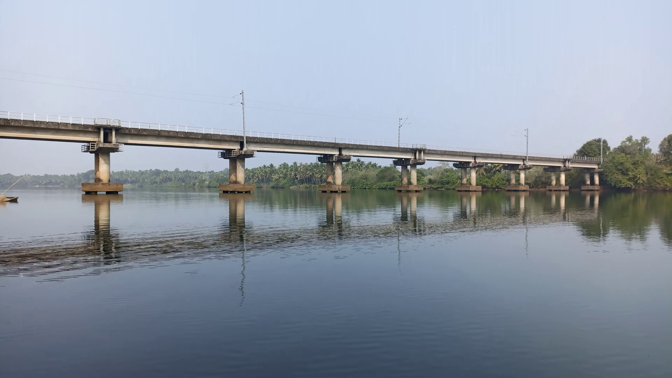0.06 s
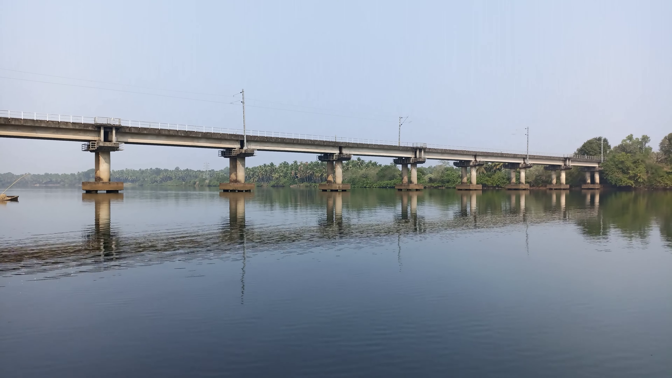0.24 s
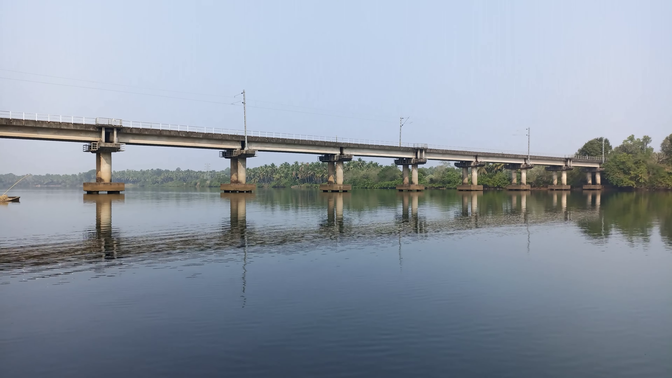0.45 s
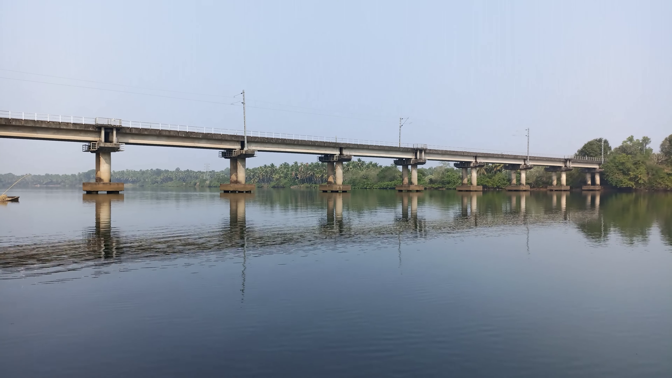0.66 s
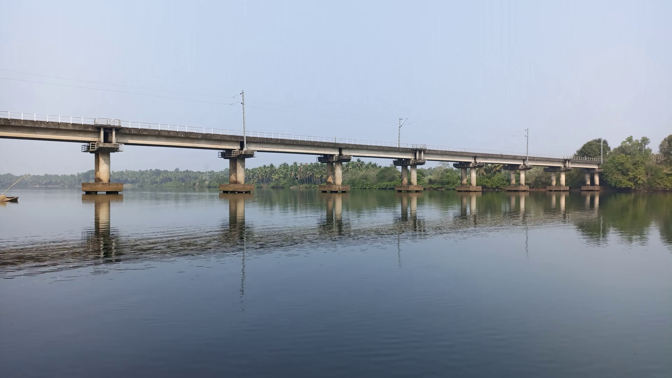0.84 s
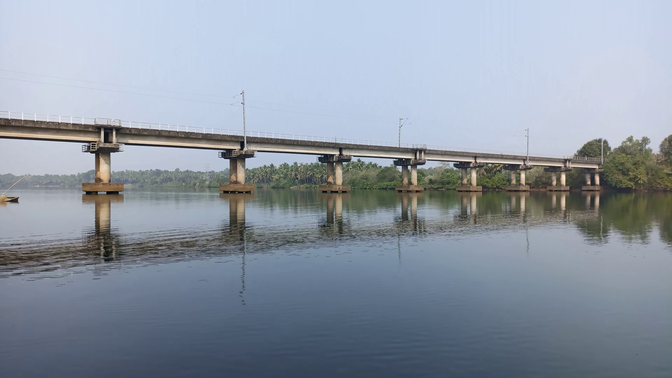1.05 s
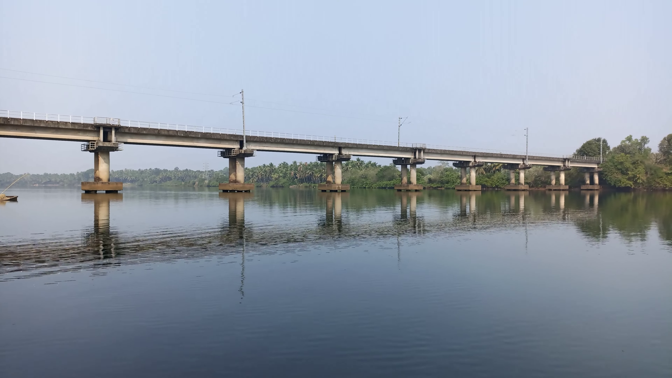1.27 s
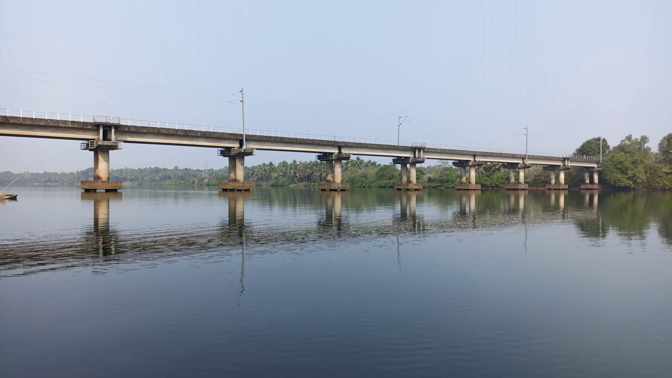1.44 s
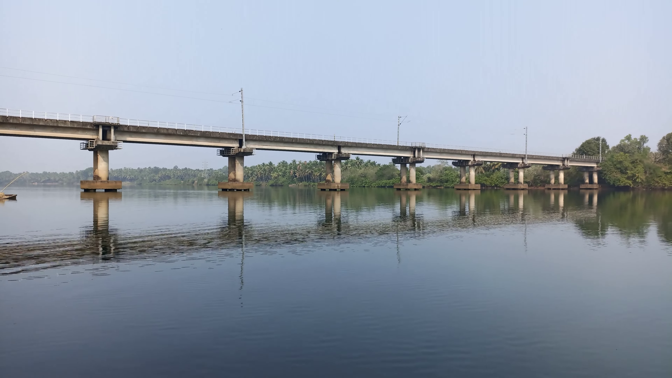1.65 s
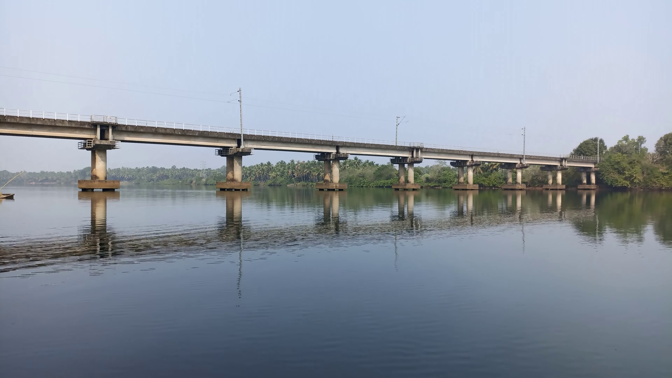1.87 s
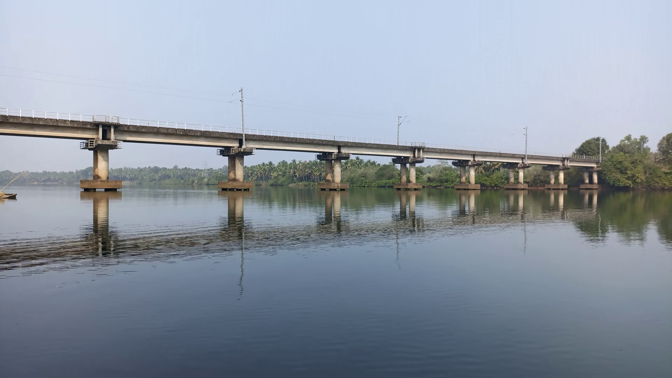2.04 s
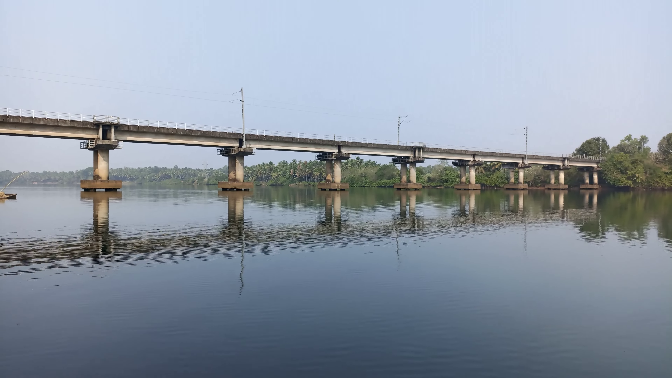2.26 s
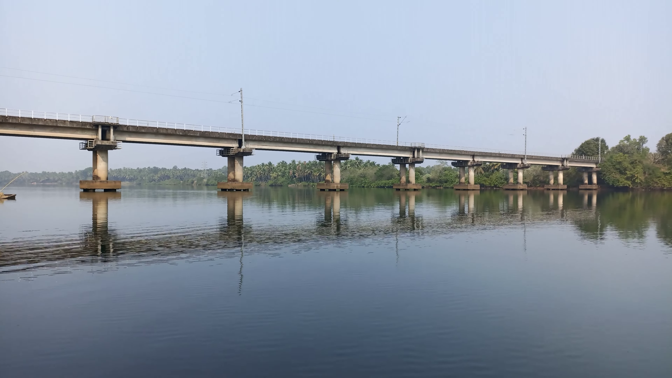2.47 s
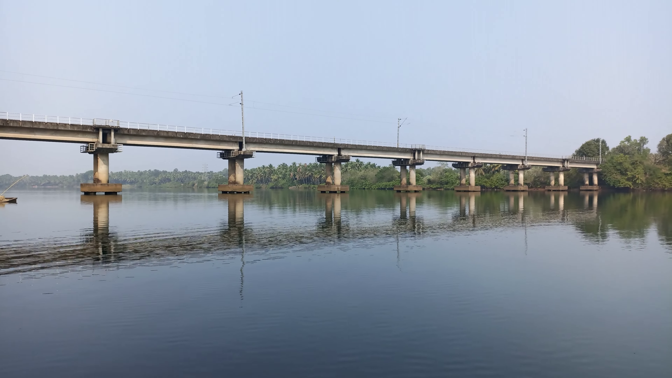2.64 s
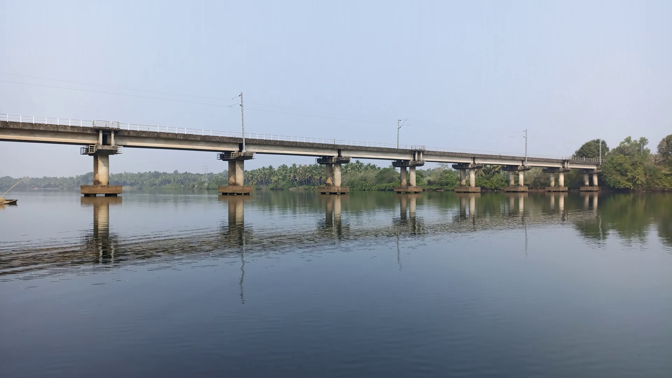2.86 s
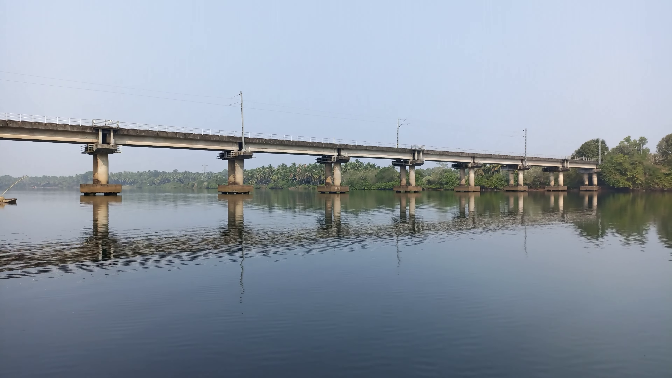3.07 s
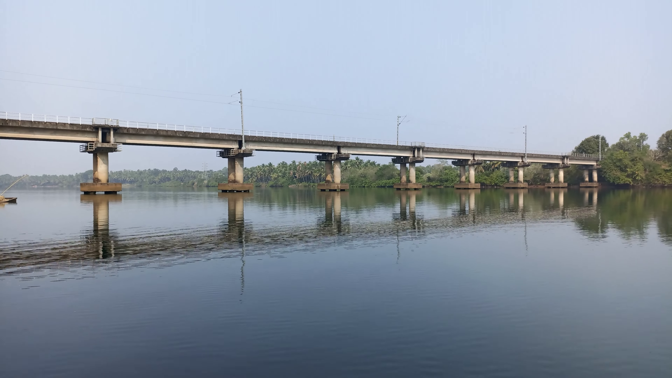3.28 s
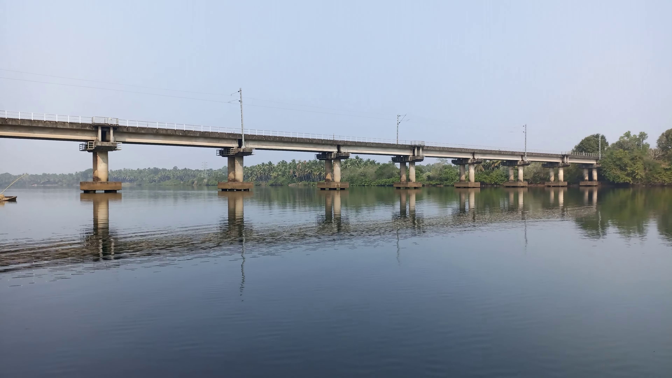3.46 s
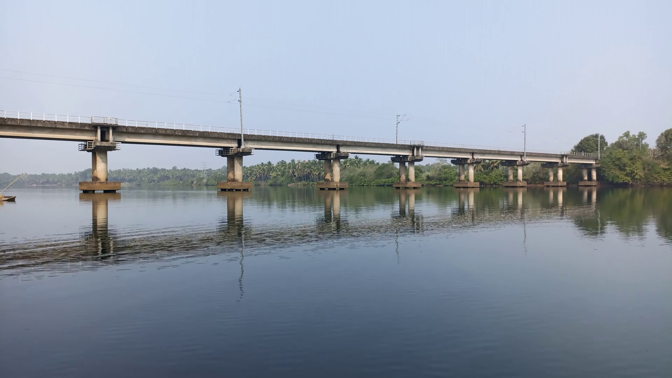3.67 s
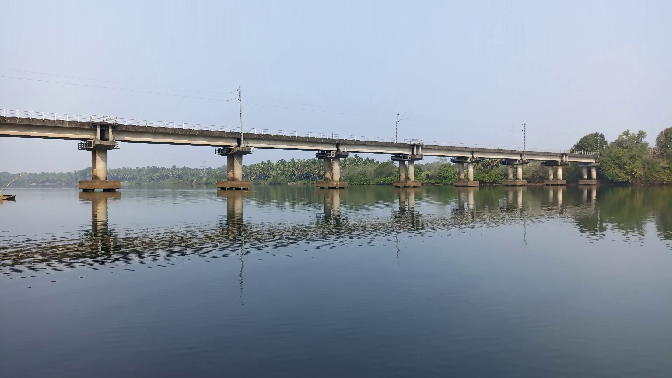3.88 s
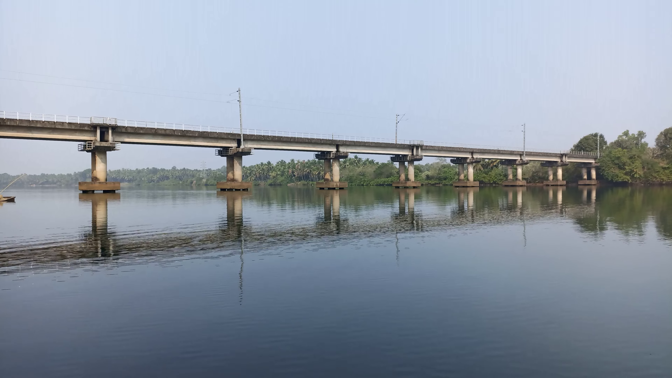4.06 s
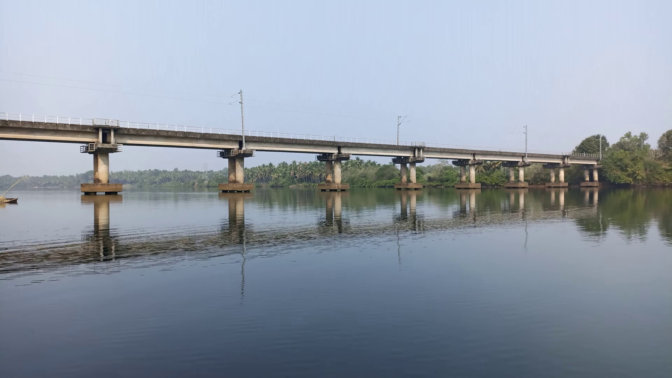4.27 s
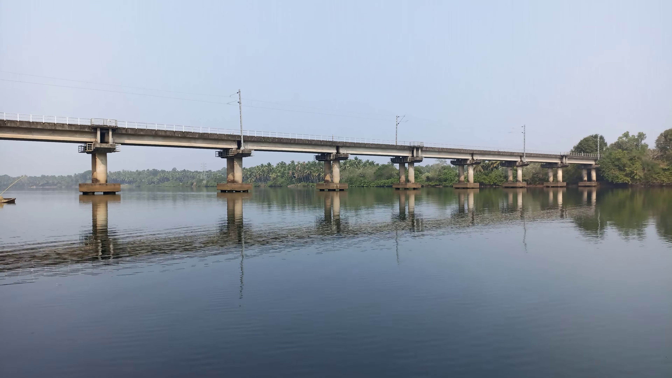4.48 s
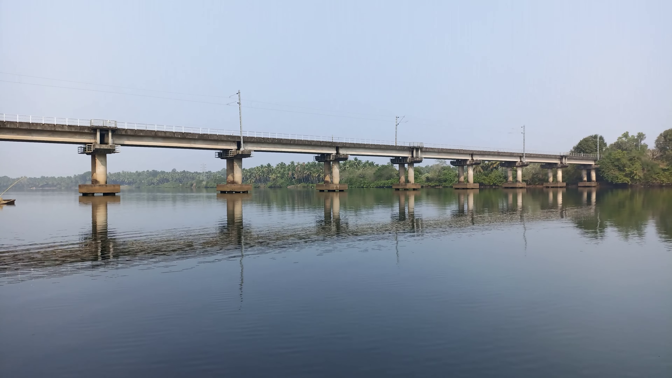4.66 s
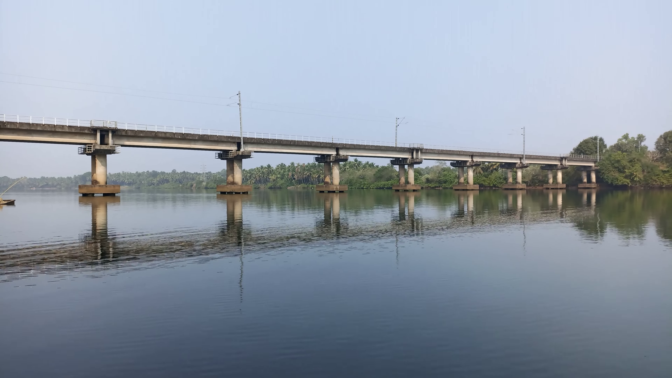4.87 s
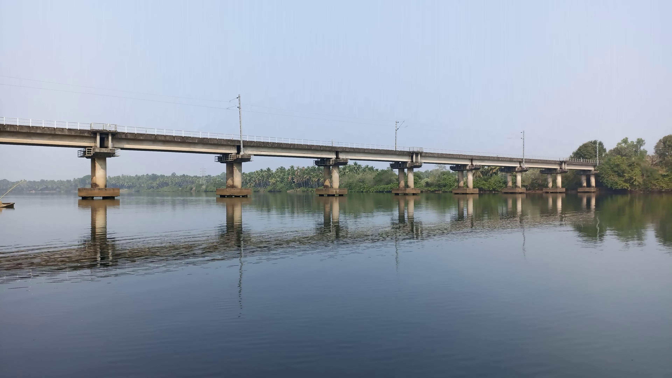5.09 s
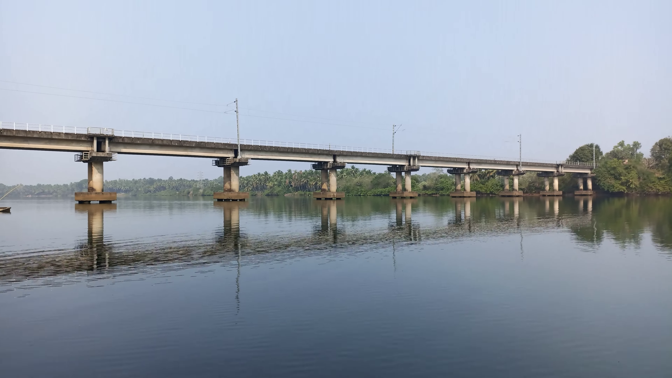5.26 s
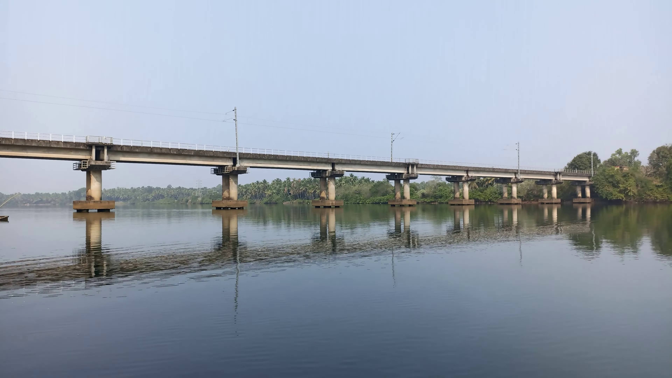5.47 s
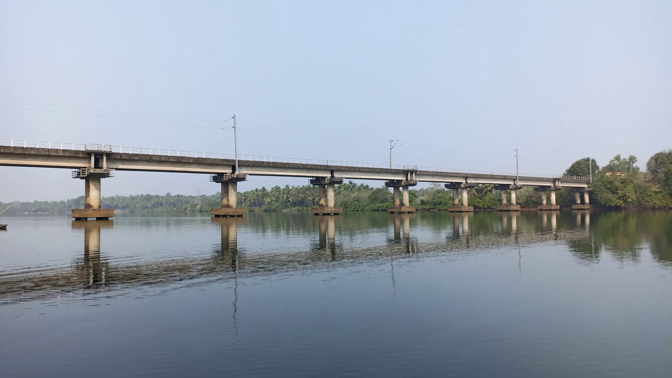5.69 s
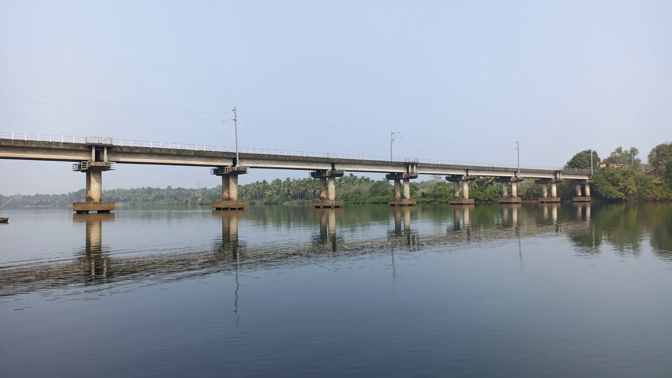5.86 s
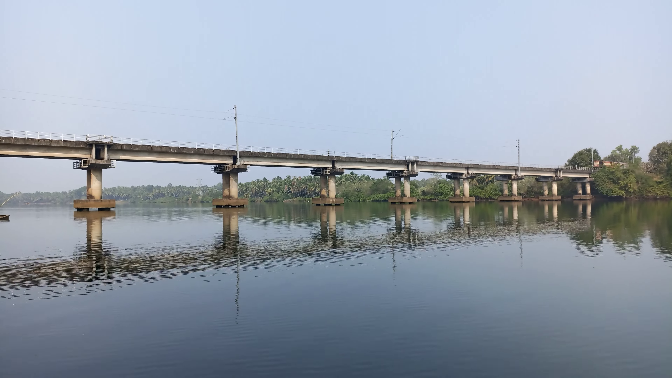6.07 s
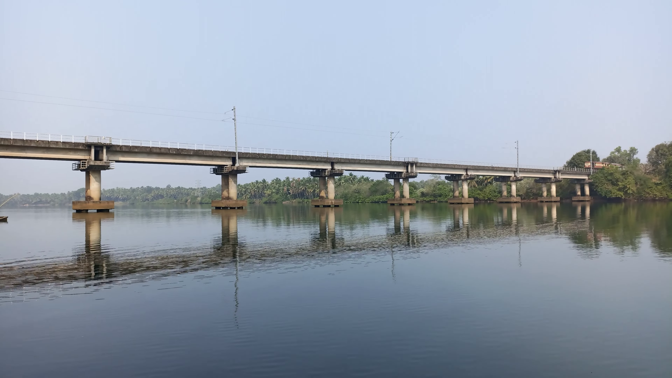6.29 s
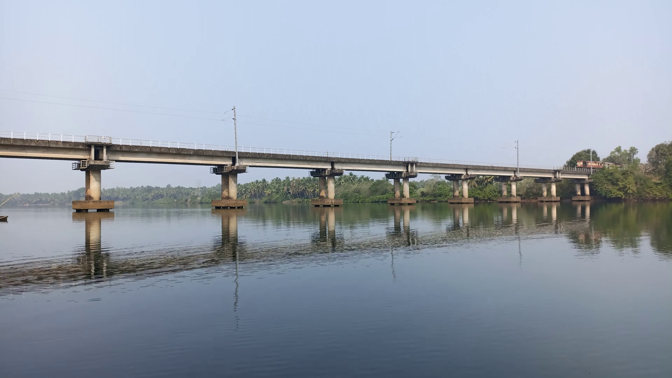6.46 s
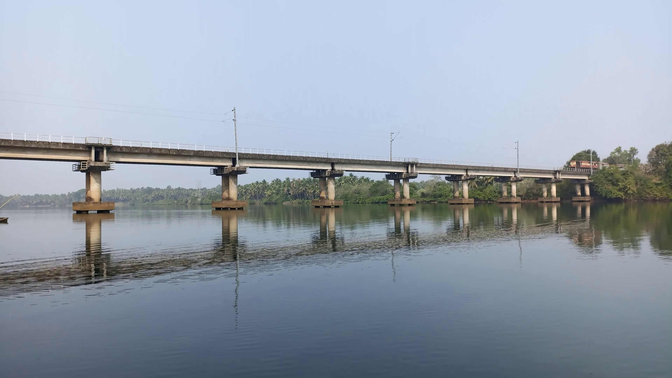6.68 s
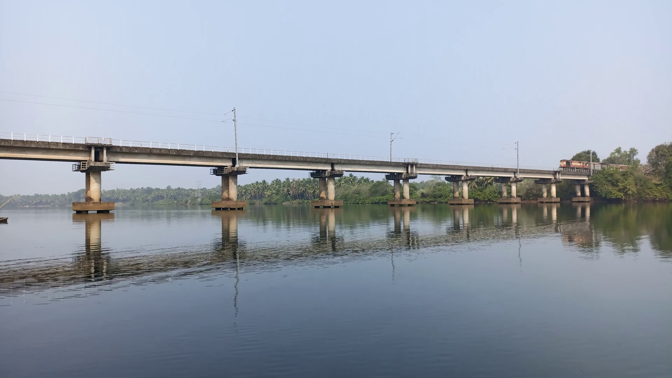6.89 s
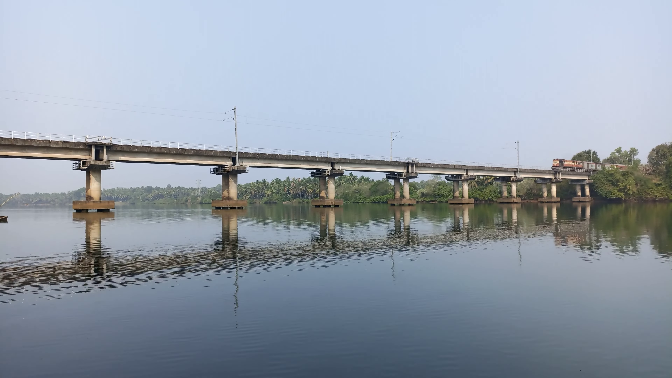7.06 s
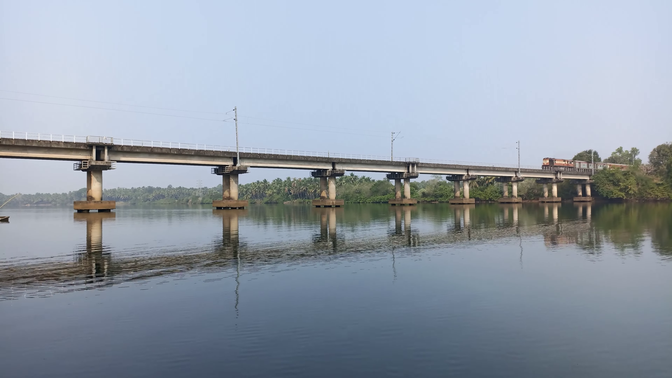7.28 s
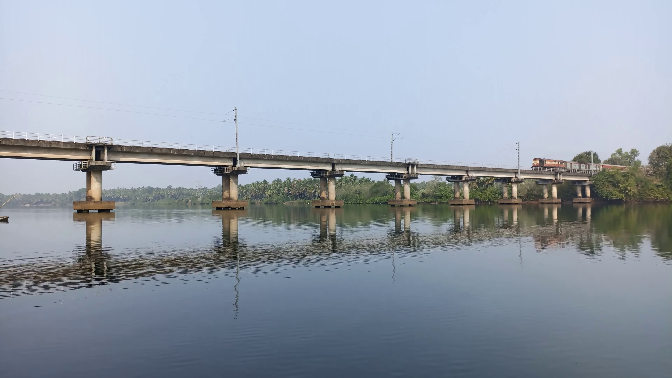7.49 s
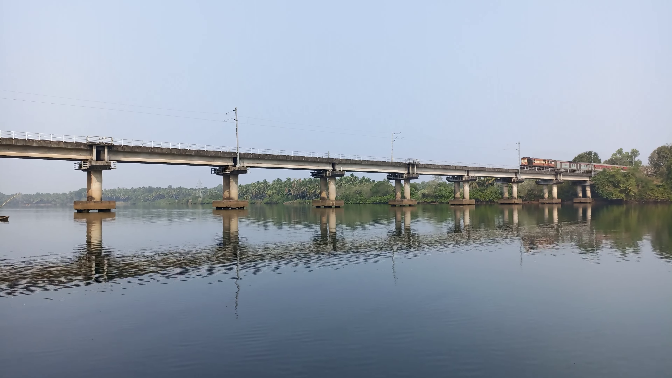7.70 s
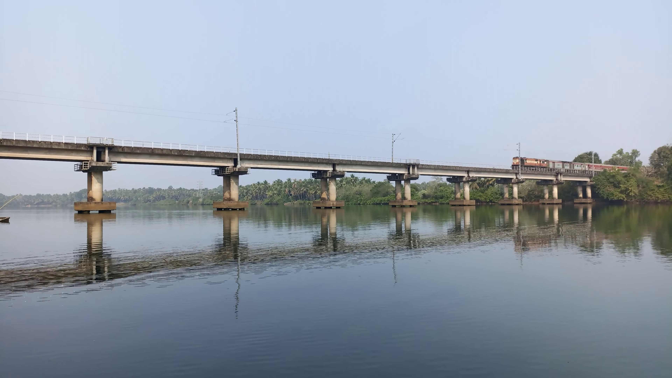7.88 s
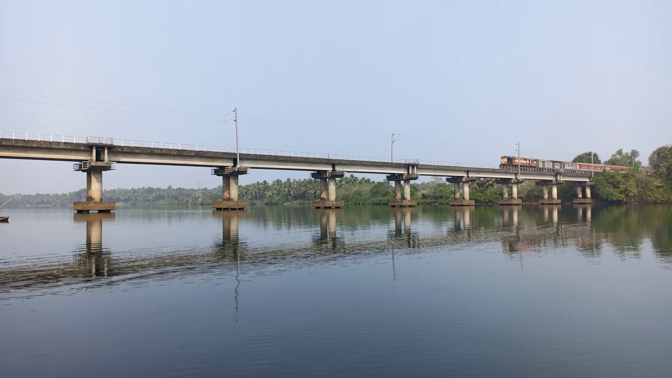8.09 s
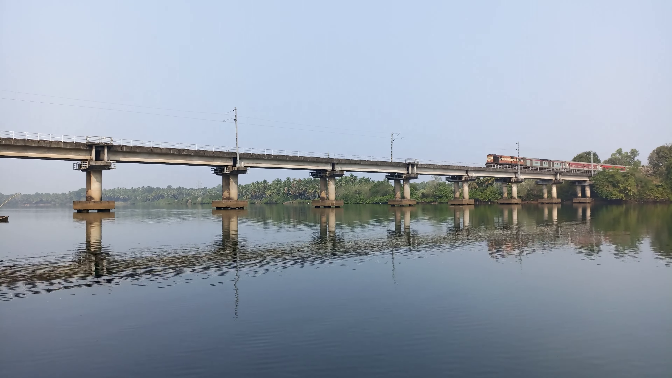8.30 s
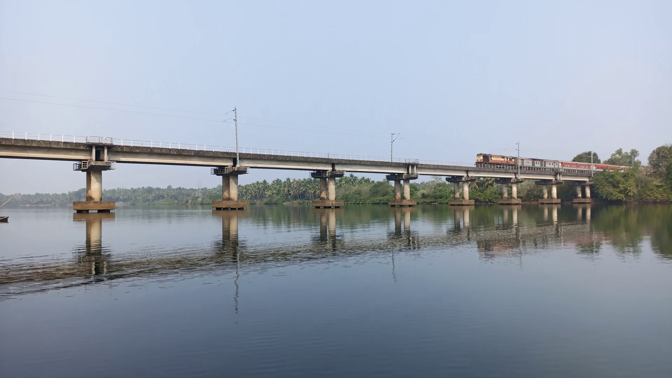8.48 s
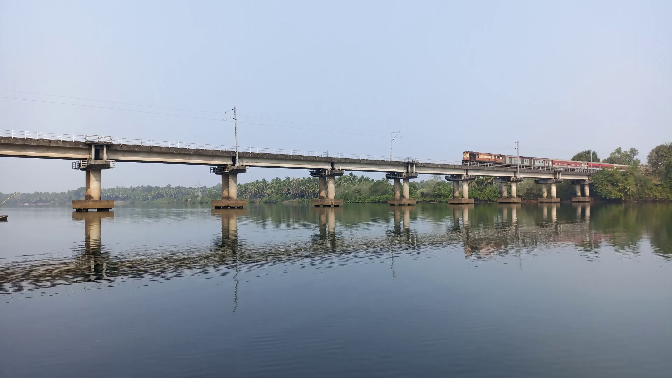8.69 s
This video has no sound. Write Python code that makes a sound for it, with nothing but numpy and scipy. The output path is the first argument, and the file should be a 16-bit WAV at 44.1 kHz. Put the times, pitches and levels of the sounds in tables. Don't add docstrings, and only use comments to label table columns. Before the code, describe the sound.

Riverbank stereo, open air over calm water, with faint steady microphone hiss. At 0 s a low two-note train horn is just ending; it stops at about 0.13 s and fluttering echoes fade by 1.2 s. Dry grass snaps and swishes, and a far bird twitters on the left in the first second and near 2.8 s. A close left cricket gives short trills around 0.6, 1.1, 2.1, 3.2 and 3.9 s; a sharp stalk snap comes at 3.2 s. Beneath, a diesel's deep uneven throb and hums notch up around 2.5-3.5 s and keep growing. From 5 s the train clears the trees: rolling roar and hiss brighten, joints clack, and flanges squeal near 3 kHz, crying out around 5.6-6.9 s. After 7.4 s it rolls over open water, with heavier clacks and gritty metallic clanks, still swelling at 8.7 s.

```python
import sys
import numpy as np
from scipy import signal
from scipy.fft import rfft, irfft, next_fast_len
from scipy.io import wavfile
from scipy.ndimage import uniform_filter1d, map_coordinates

SR = 44100
rng = np.random.default_rng(int(sys.argv[2]) if len(sys.argv) > 2 else 0)


def unload_wav(signal):
    wavfile.write(
        sys.argv[1],
        SR,
        np.round(np.clip(np.atleast_2d(signal).T, -1, 1) * 32767).astype(np.int16),
    )


def gain_from_db(level_db):
    decades = np.asarray(level_db, float) / 20
    return 10 ** decades


N = 385434
TIME = np.arange(N) / SR

# [t/s, nearness/dB, clear of the trees on the far bank 0-1]
APPROACH = [(0, -19.5, 0.43), (.7, -17.5, 0.12), (1.5, -14, .0), (2.3, -12.5, .0), (3.0, -11.5, 0.15),
            (3.7, -9.5, 0.14), (4.3, -8, 0.1), (4.8, -7, 0.33), (5.3, -7, 0.58), (5.9, -6, 0.76),
            (6.4, -4, 0.87), (6.9, -3.5, 0.83), (7.4, -3.5, 0.96), (8, -1.5, 0.9), (8.4, -1.5, 0.96),
            (8.74, 0, 0.87)]


def evened(x):
    return x / np.sqrt(np.mean(x ** 2) + 1e-20)


def read(points, hz):
    f, value = np.transpose(points)
    return np.interp(np.log(hz + 1), np.log(f + 1), value)


def curves(rows, t=TIME):
    s, *columns = np.transpose(rows)
    return [np.interp(t, s, c) for c in columns]


def waver(rate_hz):
    t = TIME[::256]
    rates = np.geomspace(rate_hz / 8, rate_hz, 12)
    slow = sum(np.sin(2 * np.pi * (f * t + rng.random())) for f in rates)
    return np.interp(TIME, t, evened(slow))


def noise(spectrum, patchy_db, likeness=0.46, size=1024, loss_db=0 * TIME):
    # [f/Hz, likeness 0-1]
    port_likeness = [(60, .995), (200, .985), (500, .9), (1000, .66), (2200, .8), (4500, .7), (6500, .72),
                     (9000, .55), (14000, .45)]
    hop, hz = size // 4, np.fft.rfftfreq(size, 1 / SR)
    a, b, c, d, patches = rng.standard_normal((N // hop + 5, len(hz), 5)).T
    patches = uniform_filter1d(patches, size=5, axis=0)
    patches = evened(uniform_filter1d(patches, size=14, axis=1))
    same = np.clip(likeness * read(port_likeness, hz), 0, 1)[:, None]
    left = a + 1j * b
    right = same * left + np.sqrt(1 - same ** 2) * (c + 1j * d)
    z = np.array([left, right])
    frame_s = np.arange(z.shape[2]) * hop / SR
    air_db = np.outer((hz / 1e4) ** 2, np.interp(frame_s, TIME, loss_db))
    inside = (hz >= spectrum[0][0]) & (hz <= spectrum[-1][0])
    z *= gain_from_db(read(spectrum, hz)[:, None] + patchy_db * patches - air_db) * inside[:, None]
    return evened(signal.istft(z, nperseg=size, noverlap=size - hop)[1][:, :N])


def bursts(events, rise_s):
    shape = np.zeros(N)
    for s, db, ring in events:
        t = np.maximum(TIME - s, 0)
        shape += gain_from_db(db - 60 * t / max(ring, .02)) * (1 - np.exp(-t / rise_s))
    return shape


def peaks(t, db, rise_db_per_s, fall_db_per_s):
    return gain_from_db(db + np.minimum(rise_db_per_s * t, -fall_db_per_s * t))


def level_db(nearest_db, db_per_db, hidden_db, span_db=0):
    span_s, span_ramp_s = 7.5, 0.29
    near_db, clear = curves(APPROACH)
    span = np.tanh((TIME - span_s) / span_ramp_s)
    return nearest_db + db_per_db * near_db - hidden_db * (1 - clear) + span_db * span


def cycles():
    # [t/s, cycle rate/Hz]
    engine_speed = [(0.0, 7.962), (1.2, 7.924), (2.4, 8.003), (2.7, 8.287), (3.0, 8.242), (3.3, 8.428),
                    (3.7, 8.532), (4.5, 8.57), (5.5, 8.578), (6.5, 8.571), (7.5, 8.557), (8.74, 8.526)]
    return np.cumsum(curves(engine_speed)[0]) / SR


def capsule_hiss():
    # [f/Hz, level/dB per Hz]
    hiss_colour = [(2060, -25), (3500, -15), (3730, -9.5), (4020, 3.5), (4380, -11), (4840, -29),
                   (6290, -26), (6620, -17.5), (7130, -18.5), (8650, -13.5), (11000, -14.5), (12100, -12),
                   (15600, -19)]
    return gain_from_db(-76.5) * noise(hiss_colour, patchy_db=.5, likeness=.3)


def birds():
    # [t/s, length/s, start f/Hz, end f/Hz, level/dB]
    twitter = [(.122, .024, 5350, 5550, -69), (.148, .022, 4250, 5050, -66), (.172, .018, 7500, 4900, -66),
               (.202, .014, 4800, 5600, -66), (.214, .014, 6250, 6300, -71), (.228, .018, 6100, 4100, -64),
               (.25, .014, 5000, 6500, -69), (.29, .015, 4200, 4200, -71), (.32, .026, 4300, 6400, -65),
               (.345, .012, 6550, 6600, -73), (.447, .07, 7250, 7200, -63), (.79, .06, 5000, 5800, -79),
               (2.75, .02, 5600, 6700, -64), (2.84, .025, 7000, 6700, -66), (2.858, .016, 5100, 5500, -65),
               (2.878, .026, 4700, 6000, -63), (2.912, .012, 6600, 4900, -67),
               (2.932, .016, 5100, 6300, -65), (2.948, .026, 6300, 4200, -67)]
    bird_db, echo_s, echo_db = -3.5, .04, -7
    out = np.zeros(N)
    for s, length, from_hz, to_hz, db in twitter:
        hz = np.linspace(from_hz, to_hz, round(length * SR))
        at = round(s * SR)
        whistle = np.sin(2 * np.pi * np.cumsum(hz) / SR)
        out[at:at + len(hz)] += gain_from_db(db + bird_db) * np.hanning(len(hz)) ** .5 * whistle
    leaves = rng.standard_normal((2, 4096)) * gain_from_db(-60 * TIME[:4096] / echo_s)
    blur = signal.oaconvolve(out[None], leaves / np.linalg.norm(leaves[0]), axes=1)[:, :N]
    return out * gain_from_db([[2.5], [-1.5]]) + gain_from_db(echo_db) * blur


def grass():
    # [f/Hz, level/dB per Hz]
    brush_colour = [(2060, -19), (3500, -8.5), (3940, -22), (4930, -12.5), (6620, -11), (7780, -10.5),
                    (8030, -15), (9330, -20.5), (10500, -13.5), (12000, -13), (15700, -17.5)]
    # [peak t/s, level/dB, length/s, left minus right/dB, less 9.5 dB]
    swishes = [(.0, -60.5, 0.12, -1.5), (0.503, -64.5, 0.088, -5.5), (0.985, -74, 0.088, -3),
               (1.733, -72, 0.16, -3.5), (2.23, -84, .06, -15), (2.4, -70, 0.049, -3.5),
               (2.534, -76, 0.21, 0), (2.8, -69.5, 0.23, -1.5), (3.297, -70, .1, -3),
               (3.77, -82.5, 0.22, 2), (4.158, -77, .06, 3), (4.24, -79, .1, 1.5), (4.483, -79, 0.11, -7.5),
               (4.775, -71, 0.28, 1), (5.546, -86, 0.14, 3)]
    # [t/s, peak level/dB, ring/s]
    snaps = [
        (.0, -42.5, 0.048),
        (.96, -77, .12),
        (2.222, -74, .08),
        (2.395, -65, 0.082),
        (2.497, -74, .1),
        (3.2365, -38.5, 0.068),
        (3.243, -50.5, 0.071),
        (3.256, -54.5, 0.092),
        (4.158, -70, 0.074),
        (4.22, -62.5, 0.074),
    ]
    # [f/Hz, level/dB per Hz]
    snap_colour = [(2350, -39), (4000, -15), (4830, -19.5), (6600, -0.5), (7500, -2), (9070, -25),
                   (10500, -10), (12000, -16.5), (13300, -16), (15690, -23)]
    stir_db, drop_db, rise_share = -89, 20.5, 0.95
    brush = gain_from_db(stir_db + 2.5 * waver(5.5) + np.array([[5.], [-5.]]))
    for s, db, length, pan_db in swishes:
        place = (TIME - s) / length / np.where(TIME < s, rise_share, 1)
        swell = gain_from_db(db + 6.0 - drop_db * abs(place) ** 1.1)
        brush = brush + swell * gain_from_db(np.outer([.5, -.5], pan_db + 9.5))
    swish = brush * noise(brush_colour, patchy_db=.7, likeness=.5, size=512)
    crack = noise(snap_colour, patchy_db=1.0, likeness=.7, size=256)
    return swish + bursts(snaps, rise_s=0.004) * crack * gain_from_db([[2.5], [-2.5]])


def cricket():
    # [t/s, chirps, spacing/s, level/dB, settled f/Hz]
    phrases = [
        (0.6432, 6, 0.063, -57.5, 6300),
        (1.1049, 6, 0.059, -58.5, 6330),
        (2.1173, 7, .0632, -58.5, 6250),
        (3.1517, 6, .0608, -57.5, 6300),
        (3.935, 7, .063, -57, 6230),
    ]
    shy_db, shy_hz = 2.5, 110
    tiring_s = .00009
    out, t = np.zeros(N), np.arange(400) / SR
    luck = rng.standard_normal((len(phrases), 8, 4))
    for (start, chirps, gap, db, hz), chance in zip(phrases, luck):
        for k in range(round(chirps)):
            pip = np.hanning(len(t)) * np.sin(2 * np.pi * (hz - shy_hz * .5 ** k) * t)
            for stroke in range(2 + (k > 1)):
                pip_db = db - shy_db * .5 ** k + 1.2 * chance[k, stroke] - 4.0 * (stroke > 1 and k < 4)
                at = round((start + k * gap + tiring_s * k ** 3 - .002 + .0138 * stroke) * SR)
                out[at:at + len(t)] += gain_from_db(pip_db) * pip
    return out * gain_from_db([[0], [-9]])


def horn():
    # [f/Hz, level/dB, left minus right/dB]
    partials = [(335.6, -34.5, 0.5), (412.4, -35, -8.5), (672, -49, 11), (831, -31, 1.5), (1053, -59.5, 8),
                (1173, -51.5, -5), (1247, -45, -4), (1660, -61, -14), (1990, -72, -12), (2070, -74, 3.5),
                (2460, -72, -2), (2670, -73, -4), (2970, -73, -2), (3000, -67, 1)]
    # [held level/dB, fall/dB per s, echo level/dB, echo fall/dB per s]
    tails = [
        (-2, 84, -14, 7),
        (0, 80, -24, 24),
        (-5, 60, -10, 15),
    ]
    shut_s, shut_soft_s, end_s = .13, .04, 1.2
    t = TIME[TIME < end_s]
    shut = shut_soft_s * np.logaddexp(0, (t - shut_s) / shut_soft_s)
    out = np.zeros((2, N))
    for hz, db, pan_db in partials:
        held_db, fall, echo_db, echo_fall = tails[(hz > 500) + (1100 < hz < 1300)]
        echo = gain_from_db(echo_db - echo_fall * t) * np.minimum(1, 4 * (end_s - t))
        for port, side in zip(out, (.5, -.5)):
            direct = gain_from_db(held_db - fall * shut + side * pan_db)
            flutter = (.7 + .33 * (waver(16) + 1j * waver(14)))[:len(t)]
            paths = direct + echo * flutter
            port[:len(t)] += (gain_from_db(db + 7.0) * paths * np.exp(2j * np.pi * hz * t)).real
    return out


def clanks():
    # [t/s, level/dB, f/Hz]
    clank_notes = [(7.439, -27, 2000), (7.4919, -27, 1810), (7.7662, -34.5, 2080), (7.7982, -25.5, 2145),
                   (7.8394, -27, 2110), (7.9044, -24, 1300), (7.9977, -27.5, 1710), (8.0294, -23, 1960),
                   (8.1214, -36.5, 2030), (8.1494, -29, 1156), (8.2701, -30, 2120), (8.3818, -23, 1890),
                   (8.5894, -27.5, 2050), (8.6194, -26.5, 1954), (8.7096, -28, 1910), (8.7294, -19, 1620)]
    clank_db, rise_s, ring_s, grit_s = -8, .004, .11, .003
    out, t = np.zeros(N + SR), TIME[:SR // 5]
    for (s, db, hz), grit in zip(clank_notes, rng.standard_normal((len(clank_notes), 2, len(t)))):
        a, b = evened(uniform_filter1d(grit, max(round(grit_s * SR), 1), axis=1))
        shape = gain_from_db(db + clank_db - 60 * t / ring_s) * (1 - np.exp(-t / rise_s))
        out[round(s * SR):][:len(t)] += shape * ((1 + a + 1j * b) * np.exp(2j * np.pi * hz * t)).real
    return out[:N]


def clacks():
    # [t/s, thud level/dB, tick level/dB]
    clack_beats = [(5.122, -41, -53), (5.62, -59, -47), (5.788, -54, -54), (5.927, -47, -38), (6.045, -52, -40),
                   (6.185, -60, -37), (6.396, -56, -29), (6.597, -38, -36), (6.855, -41, -31), (6.975, -49, -45),
                   (7.1, -40, -36), (7.205, -34, -35), (7.325, -50, -32), (7.445, -40, -65), (7.551, -67, -32.5),
                   (7.676, -38, -34), (7.8, -35, -43), (7.911, -26.5, -30), (8.03, -30, -46), (8.125, -24, -54),
                   (8.145, -47, -35), (8.261, -28.5, -29), (8.376, -23.5, -38), (8.56, -28, -31),
                   (8.618, -34.5, -33), (8.726, -21.5, -41)]
    # [f/Hz, level/dB per Hz]
    thud_colour = [(700, -33), (1100, 1.5), (1900, 0), (2200, -9), (2600, -22), (3500, 0), (4500, -16),
                   (6000, -35)]
    # [f/Hz, level/dB per Hz]
    tick_colour = [(2500, -27), (3500, -3), (5000, -7.5), (5800, 2), (6750, 0), (7100, -8), (9500, -16.5),
                   (15000, -40)]
    thud_ring_s, tick_ring_s = 0.18, 0.082
    thuds = bursts([(s, db, thud_ring_s) for s, db, _ in clack_beats], rise_s=.008)
    ticks = bursts([(s, db, tick_ring_s) for s, _, db in clack_beats], rise_s=.005)
    return (thuds * noise(thud_colour, patchy_db=1.5, likeness=0.65, size=256)
            + ticks * noise(tick_colour, patchy_db=2.8, likeness=0.97, size=256))


def squeal():
    # [t/s, f/Hz]
    wheel_mode = [(3, 2860), (5.0, 2892), (5.7, 2900), (6.2, 2940), (6.5, 2970), (7.0, 2982), (8.74, 3070)]
    # [peak t/s, level/dB, swell/dB per s, fade/dB per s]
    swells = [
        (6.4, -45.5, 7.5, 13.5),
        (18, -43.5, 18, 2),
        (3.6, -68.5, 2, 2),
    ]
    # [t/s, level/dB]
    grips = [(5.6, -39), (5.69, -41), (5.845, -39), (5.93, -40), (6.045, -48), (6.19, -61), (6.28, -39),
             (6.4, -60), (6.445, -37), (6.5, -45), (6.58, -48), (6.66, -35), (6.775, -39), (6.86, -46),
             (6.922, -56)]
    width_hz, grip_ring_s = 280, .1
    scrape = sum(peaks(TIME - s, db, rise, fall) for s, db, rise, fall in swells) * gain_from_db(1.7 * waver(25))
    scrape = scrape + bursts([(s, db, grip_ring_s) for s, db in grips], rise_s=0.0036)
    a, b, c, d = rng.standard_normal((N, 4)).T
    left = a + 1j * b
    rub = np.array([left, 0.49 * left + 1.0 * (c + 1j * d)])
    r = np.exp(-np.pi * width_hz / SR)
    rub = signal.lfilter([1], [1, -2 * r, r ** 2], rub)
    mode = np.exp(2j * np.pi * np.cumsum(curves(wheel_mode)[0]) / SR)
    return scrape * evened((rub * mode).real)


def rolling():
    # [f/Hz, level/dB per Hz]
    rumble_colour = [(15, -62), (25, -30), (56, -14), (108, -2), (209, -2), (420, -11.5), (550, -20.5),
                     (920, -120)]
    # [f/Hz, level/dB per Hz]
    drone_colour = [(180, -5), (300, -2.5), (430, -9.5), (688, -8.5), (772, -7), (914, -14.5),
                    (1200, -19.5), (1560, -28), (2640, -120)]
    # [f/Hz, level/dB per Hz]
    roar_colour = [(600, -33.5), (900, -30), (1250, 3.5), (1700, 11), (1950, 8.5), (2150, -1), (2350, -2),
                   (2600, -7), (3300, -41)]
    # [f/Hz, level/dB per Hz]
    ring_colour = [(1800, -33.5), (2350, 2), (2700, -1), (3000, -3), (3300, -2), (3700, -6), (4600, -14),
                   (6000, -31)]
    # [f/Hz, level/dB per Hz]
    hiss_colour = [(2350, -31), (4000, 0), (5440, -1), (6060, 3.5), (6800, 0.5), (7100, -2.5),
                   (9380, -13.5), (12100, -19), (14500, -31), (15700, -41.5)]
    chuff = np.cos(2 * np.pi * (cycles() - .1)) * (1 + .5 * waver(4))
    rumble = gain_from_db(level_db(-25, 1.01, 0.1)) * noise(rumble_colour, patchy_db=0.0, likeness=0.97, size=4096)
    drone = gain_from_db(level_db(-26.5, 0.82, 4.2)) * noise(drone_colour, patchy_db=2.0, likeness=0.97, size=2048)
    roar_db = level_db(-37.5, 0.73, 10.6, span_db=2.0) + 0.67 * chuff
    roar = gain_from_db(roar_db) * noise(roar_colour, patchy_db=0.7, likeness=0.59)
    ring_db = level_db(-35, 1, 13.6, span_db=1.0) + 0.4 * chuff
    ring = gain_from_db(ring_db) * noise(ring_colour, patchy_db=1.5, likeness=0.81)
    hiss_db = level_db(-40.5, 0.69, 22.7, span_db=-1.0) + 0.73 * chuff
    loss_db = level_db(-1.6, -1.17, 3.1, span_db=-1.5)
    hiss = gain_from_db(hiss_db) * noise(hiss_colour, patchy_db=2.1, likeness=0.64, loss_db=loss_db)
    return rumble + drone + roar + ring + hiss


def shaft(speed, start_turns, shaft_db):
    turns = start_turns + np.cumsum(curves(speed)[0]) / SR
    return np.sqrt(2) * gain_from_db(shaft_db + 1.1 * waver(3.7)) * np.sin(2 * np.pi * turns)


def fan():
    # [t/s, f/Hz]
    fan_speed = [(0, 81.87), (3, 81.67), (6.8, 81.44), (7.3, 81.25), (8.74, 81.16)]
    return shaft(fan_speed, .57, level_db(-29, 1, 0.1))


def blower():
    # [t/s, f/Hz]
    blower_speed = [(0.0, 116.73), (1.0, 117.16), (2.2, 117.06), (3.0, 121.7), (3.6, 123.41), (4.2, 125.36),
                    (5.2, 125.59), (7.0, 125.69), (8.74, 125.01)]
    return shaft(blower_speed, .48, level_db(-26, 1, 3))


def exhaust():
    # [crank angle/deg, level/dB]
    cylinders = [(14.9, -5.7), (71.4, -7.2), (134.4, -15.7), (147.7, -11.0), (226.3, -5.8), (246.8, -10.0),
                 (321.0, -19.0), (355.5, -13.0), (380.5, -18.1), (431.1, -9.8), (507.0, -9.9),
                 (548.9, -7.5), (563.9, -3.2), (642.0, 0.0), (659.5, -1.8), (699.5, -15.9)]
    stack_modes = [
        (13, 14.92, 1),
        (26.56, 4, -.6),
    ]
    # [cycle order, far level/dB, near level/dB]
    mirror = [(11, 0, -3), (12, -1, 0), (14, -3, 1), (15, -4, 2), (16, -4, 1), (17, -2, -4), (18, -3, 6),
              (20, -1, -3), (21, 1, 4), (23, -3, -7), (24, -1, 2), (25, 0, -3), (28, -4, -2), (31, 2, -4),
              (36, -2, 0)]
    stack_lag = .88
    mirror_from_db, mirror_over_db = -8.5, 5.5
    lead, lead_lost_per_s = .0055, .0004
    order = np.arange(11, 37)
    angle, db = np.transpose(cylinders)
    puffs = np.exp(-2j * np.pi * np.outer(order, angle / 720)) @ gain_from_db(db)
    ring = 0
    for mode, width, share in stack_modes:
        damping = 1j * order * width
        ring = ring + share * (damping / (mode ** 2 - order ** 2 + damping)) ** 2
    line = puffs * ring * np.exp(1j * stack_lag)
    line /= np.linalg.norm(line) / np.sqrt(2)
    near = np.clip((curves(APPROACH)[0] - mirror_from_db) / mirror_over_db, 0, 1)
    turn = cycles() + lead - lead_lost_per_s * TIME
    out = 0
    for k, z, far_db, near_db in zip(order, line, *curves(mirror, order)):
        air_db = .06 * k * waver(2.5)
        gain = abs(z) * gain_from_db(far_db + (near_db - far_db) * near + air_db)
        out = out + gain * np.cos(2 * np.pi * k * turn + np.angle(z))
    return gain_from_db(level_db(-18.8, 1, 0.1)) * out


def scene():
    # [t/s, lag/samples]
    left_lag = [(0, 16), (3.5, 15.3), (5.5, 13.8), (7, 12.5), (8, 10.6), (8.74, 9.3)]
    train = exhaust() + fan() + blower() + rolling() + squeal() + clacks() + horn() + clanks()
    late = np.arange(N) - curves(left_lag)[0]
    train[0] = map_coordinates(train[0], [late], order=3, mode="mirror")
    return train + cricket() + birds() + grass()


def top_cut(x):
    return signal.sosfilt(signal.butter(12, 15710, fs=SR, output="sos"), x)


def record(dry):
    # [f/Hz, left minus right/dB]
    port_balance = [(60, 2.5), (150, 0.5), (290, 2.5), (640, -4.5), (1410, -2), (3100, 2.5), (6820, 5),
                    (15000, -8)]
    # [f/Hz, width/Hz, level/dB]
    left_port = [
        (830, 490, 2),
        (1300, 240, -0.5),
        (2117, 230, 10),
        (3100, 260, 1),
        (3525, 85, 4),
        (5270, 270, -0.5),
        (6630, 210, 4.5),
        (11030, 1930, -16),
        (11200, 600, -3),
        (13200, 2400, -8.5),
    ]
    # [f/Hz, width/Hz, level/dB]
    right_port = [
        (798, 158, -8),
        (1887, 236, 5),
        (2134, 420, -4.5),
        (3430, 590, -4),
        (6100, 1200, 1),
        (7500, 1160, -11),
        (10050, 520, 5),
        (11200, 460, 0),
        (12060, 920, 6),
    ]
    # [f/Hz, turn/rad]
    port_turn = [(200, 0.018), (400, -0.41), (690, 0.54), (950, -0.61), (1380, -0.47), (2150, 0.59),
                 (3010, -0.36), (3360, 0.44), (3880, -0.77), (5510, 0.15), (6290, -0.49), (8000, 0.51)]
    size = next_fast_len(N + 2048)
    hz = np.fft.rfftfreq(size, 1 / SR)
    cavity_db = [sum(db * np.exp(-((hz - f) / (w / 2)) ** 2 / 2) for f, w, db in port)
                 for port in (left_port, right_port)]
    colour = gain_from_db(np.outer([.5, -.5], read(port_balance, hz)) + cavity_db)
    colour = colour * np.exp(1j * np.outer([.5, -.5], read(port_turn, hz)))
    heard = irfft(rfft(dry, size) * colour, size)[:, :N]
    return top_cut(heard + capsule_hiss())


dry = scene()
out = record(dry)
unload_wav(out)
```